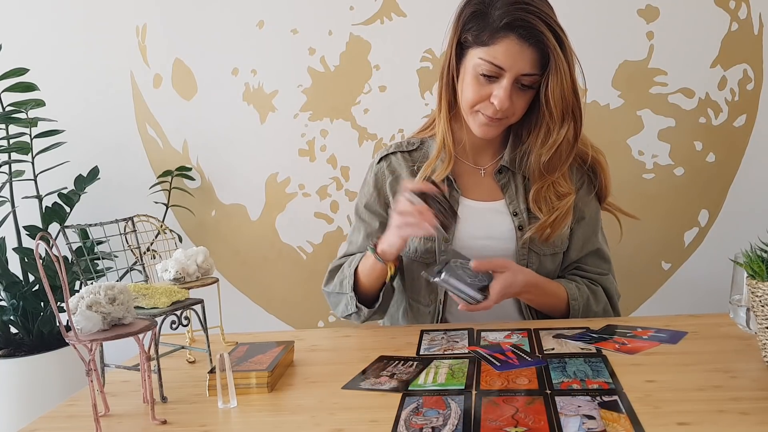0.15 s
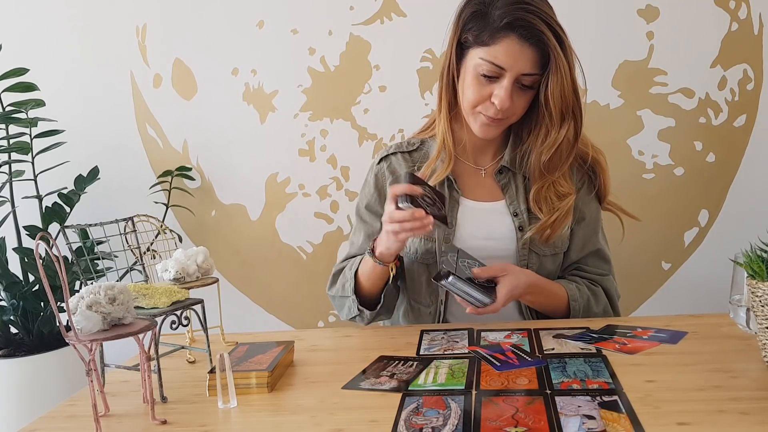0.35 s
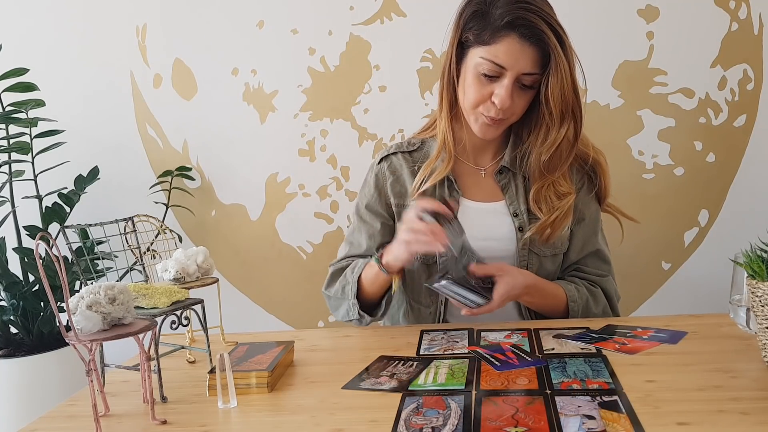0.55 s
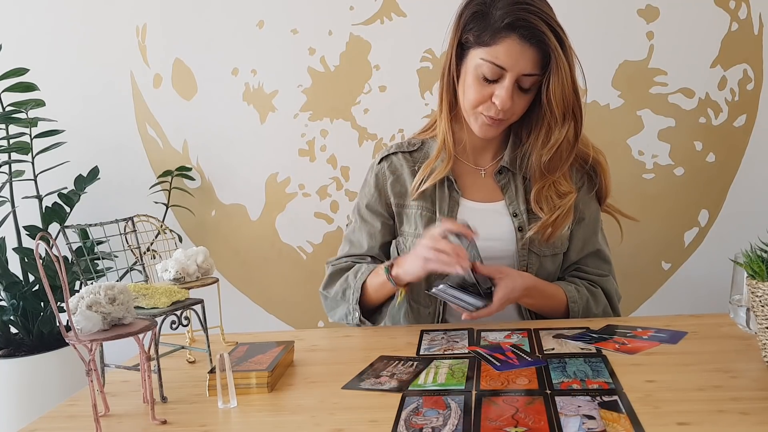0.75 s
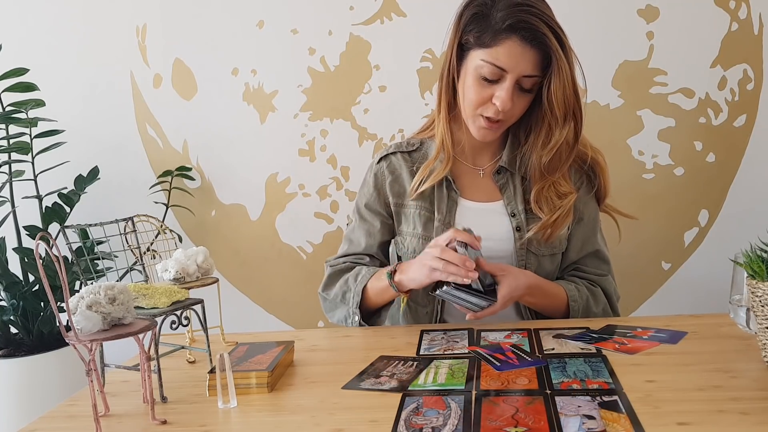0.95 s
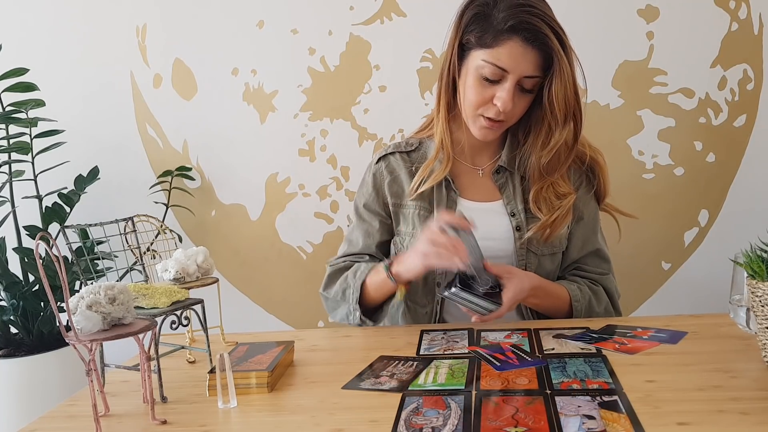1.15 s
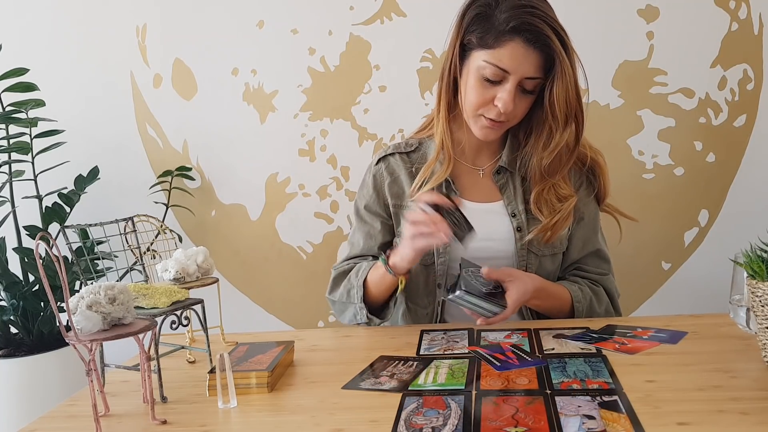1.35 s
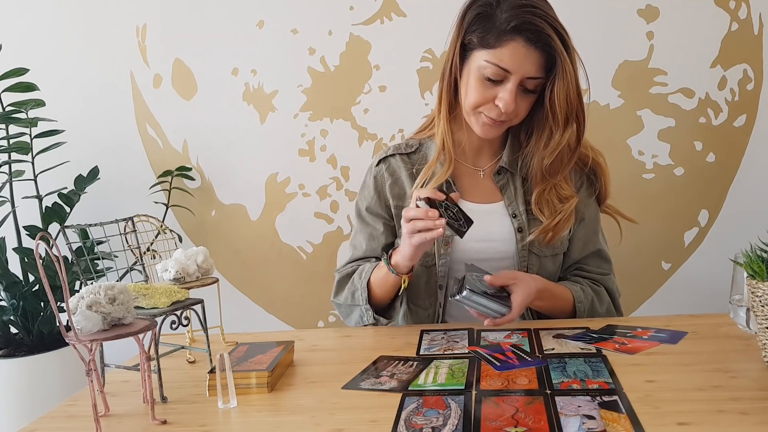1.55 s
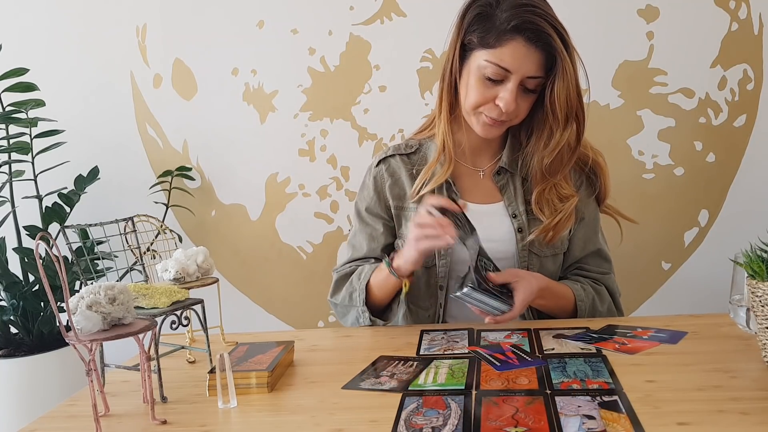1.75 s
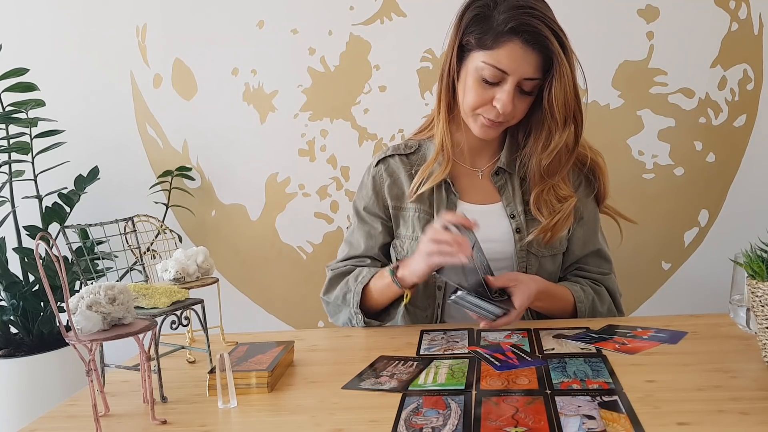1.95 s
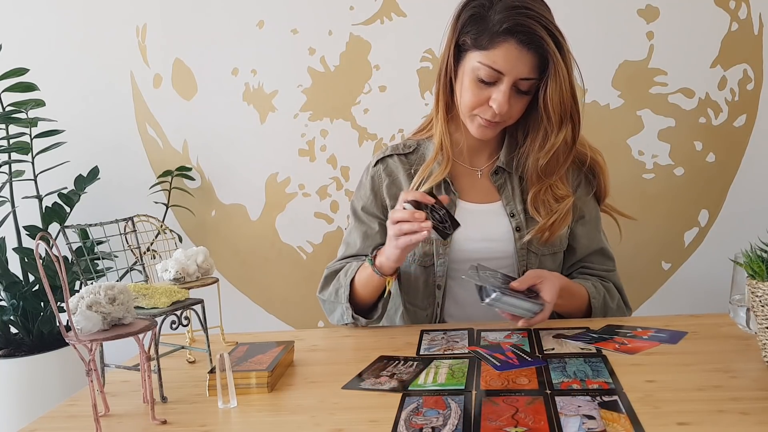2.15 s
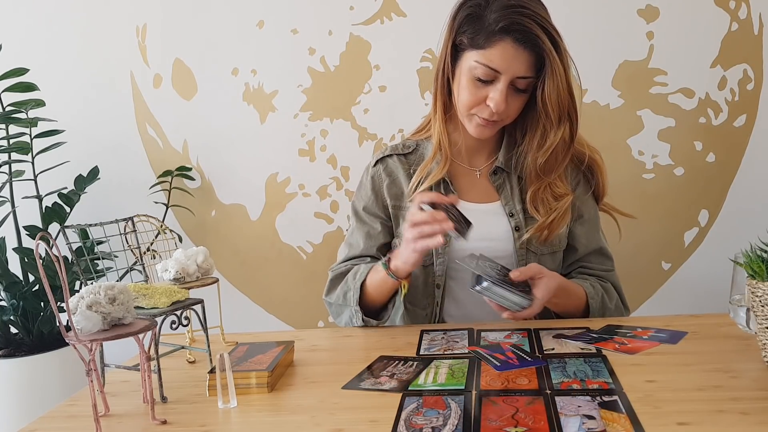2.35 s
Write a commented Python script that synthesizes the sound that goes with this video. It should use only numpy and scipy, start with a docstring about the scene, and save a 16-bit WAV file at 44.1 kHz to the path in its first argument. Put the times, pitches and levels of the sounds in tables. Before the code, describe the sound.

A deck of large cards shuffled overhand, snapping and sliding in quick clusters, in a lively room

```python
"""A deck of large cards is shuffled overhand at a table in a bare, lively room, over a low steady rumble.
At once a packet is sliding: stick-slip friction drives a resonant card stack, and the room answers with
echoes and a diffuse tail. Soft bumps of the deck in the palm join in, low tones with a puff of noise.
Then card edges snap and packets slap onto the deck, impulses followed by a scatter of smaller ones.
A stereo microphone a few steps away hears more of the room than of the hands."""
import sys
import numpy as np
from scipy import signal
from scipy.fft import rfft, irfft, next_fast_len
from scipy.io import wavfile
from scipy.ndimage import uniform_filter1d

SR = 44100
rng = np.random.default_rng(int(sys.argv[2]) if len(sys.argv) > 2 else 0)


def int16_out(signal):
    """Quantize to a 16-bit WAV file."""
    q = np.round(np.clip(np.atleast_2d(signal).T, -1, 1) * 32767)
    wavfile.write(sys.argv[1], SR, q.astype(np.int16))


N = 105840  # samples


def amp(db):
    """Level law: 20 dB is a factor of ten in amplitude."""
    return 10 ** (np.asarray(db) / 20)


def unit(x):
    """Normalization: scales to an energy of one."""
    return x / np.sqrt(np.sum(x ** 2) + 1e-20)


def sized(x, db):
    """Energy equivalence: gives a sound the energy of a hundredth of a second at that level."""
    return unit(x) * amp(db) * np.sqrt(SR / 100)


def read(points, hz):
    """Logarithmic frequency scale: interpolates a table along it."""
    f, value = np.transpose(points)
    return np.interp(np.log(hz + 1), np.log(f + 1), value)


def add(mix, s, sound):
    """Superposition: mixes a sound in at a time, cutting what falls outside."""
    at = round(s * SR)
    sound = sound[..., max(-at, 0):]
    part = mix[..., max(at, 0):][..., :sound.shape[-1]]
    part += sound[..., :part.shape[-1]]


def coherent_pair(a, b, same):
    """Partial coherence: the second channel shares the fraction `same` of the first."""
    return np.array([a, same * a + np.sqrt(1 - same ** 2) * b])


# spectrum of the room's background: (frequency [Hz], relative level [dB])
RUMBLE_SPECTRUM = [(25, -18), (44, 3.5), (62, -13), (84, 3), (110, -12.5), (220, -24.5), (600, -34),
                   (3000, -38)]
RUMBLE_DB, RUMBLE_COHERENCE = -64.5, .965  # RMS level over both channels; 1 is identical channels


def rumble():
    """Stationary random noise: the low steady background of the room, with faint hiss."""
    a, b = rng.standard_normal((2, N))
    spectrum = rfft(coherent_pair(a, b, RUMBLE_COHERENCE))
    x = irfft(spectrum * amp(read(RUMBLE_SPECTRUM, np.fft.rfftfreq(N, 1 / SR))), N)
    return amp(RUMBLE_DB) * x / x.std()


PATHS = 6  # separate ways through the room
SLIPS_PER_S, SLIP_SPREAD_DB = 6100, 3.5  # mean rate; scale of the exponential spread in level


def slips(count):
    """Stick-slip: random impulses of uneven size, each radiating into the room along one of several paths."""
    size_db = SLIP_SPREAD_DB * np.minimum(rng.exponential(1, count), 3)
    occurs = rng.random(count) < SLIPS_PER_S / SR
    train = rng.choice([-1., 1.], count) * amp(size_db) * occurs
    return train * (rng.integers(0, PATHS, count) == np.arange(PATHS)[:, None])


def hump(hz, centre_hz, q):
    """Resonance: amplitude gain of one damped oscillator, one at its centre."""
    return 1 / np.sqrt(1 + (q * (hz / centre_hz - centre_hz / hz)) ** 2)


# colour of card stock: (frequency [Hz], gain [dB])
CARD_COLOUR = [(30, -22), (70, -19.5), (130, -11), (210, -12), (300, -8.5), (600, -2.5), (1000, -4),
               (1300, -3), (2000, -4), (2700, -0.5), (4400, -3), (6000, -8), (8000, -12.5), (11000, -13),
               (15500, -20.5)]
BASS_HZ, TREBLE_HZ = 770, 6300  # corners of the low and high shelves


def packet(q, pitch_hz, ring_db, bass_db, treble_db, size=2048):
    """Minimum-phase response: card colour and one damped bending resonance of a gripped packet."""
    hz = abs(np.fft.fftfreq(size, 1 / SR)) + 1
    bass = bass_db / (1 + (hz / BASS_HZ) ** 4)
    treble = treble_db / (1 + (TREBLE_HZ / hz) ** 4)
    db = read(CARD_COLOUR, hz) + bass + treble + ring_db * hump(hz, pitch_hz, q)
    # the Hilbert transform of the log gain supplies the phase of a causal response
    log_response = np.conj(signal.hilbert(np.log(amp(db))))
    return np.fft.ifft(np.exp(log_response)).real[:size // 2]


# cards rubbing over each other: (time [s], swell [s], fade [s], relative level [dB],
# packet pitch [Hz], packet ring [dB], bass [dB], treble [dB])
SLIDE_EVENTS = [ (-.06, .07, .035, -51, 1250, 3, 8, -3), (.068, .015, .011, -41, 2900, 1, 5, 4),
                (.340, 0.0071, 0.024, -41, 1390, 6.5, 4.5, -0.5),
                (0.585, 0.0059, 0.0088, -37, 1650, 6.5, 7, 2),
                (.748, 0.0029, 0.0095, -42, 2600, 25, -9, 20),
                (.820, 0.0016, 0.0036, -31, 994, 22.5, 16, 15),
                (.990, 0.0052, 0.036, -53.5, 1000, 7, 3.5, 8.5),
                (1.066, 0.011, 0.0051, -35, 1680, 12, 2, 10.5),
                (1.214, 0.008, 0.067, -55.5, 1600, 8, -2, 6.5),
                (1.303, 0.0055, 0.008, -38, 4050, 6.5, 4, 7.5),
                (1.462, 0.015, 0.0059, -38, 3700, -2.5, -26.5, -4),
                (1.533, 0.0058, 0.0071, -33, 1340, 12, 5.5, 5),
                (1.678, 0.0032, 0.024, -43, 1540, 8, 3.5, 5), (1.840, 0.028, 0.079, -44.5, 1630, 3, 5, 2.5),
                (1.915, 0.019, 0.0064, -47, 332, 16, 20, -6),
                (1.995, 0.027, 0.0054, -42, 1810, 6.5, 1.5, 6)]
SLIDE_DIRECT_DB, SLIDE_Q = 0.5, 5.3  # gain of the direct sound; sharpness of the packet resonance
JUDDER_DB, JUDDER_PER_S = 2.5, 126.6  # standard deviation and rate of the random levels


def slide(swell_s, fade_s, db, *colour):
    """Friction: noise swells as a packet gathers speed, judders, and fades as it comes free."""
    t = np.arange(SR // 3) / SR
    fade = np.exp(-(np.maximum(t - swell_s, 0) / fade_s) ** 2 / 2)
    speed = np.minimum(t / swell_s, 1) * fade
    # the packet catches and lets go
    catches = np.interp(t * JUDDER_PER_S, np.arange(64), rng.standard_normal(64))
    drive = unit(slips(len(t)) * speed * amp(JUDDER_DB * catches)) * np.linalg.norm(speed)
    return amp(db) * signal.fftconvolve(drive, unit(packet(SLIDE_Q, *colour))[None], axes=1)


def evened(x, envelope, count=4):
    """Spectral whitening: lays an envelope on a random burst and smooths chance peaks out of its spectrum."""
    x = x * envelope
    for _ in range(count):
        z = rfft(x)
        x = irfft(z / (abs(z) + 1e-12), len(x))
        local_level = np.sqrt(abs(uniform_filter1d(x ** 2, size=128)) + 1e-14)
        x = x * envelope / local_level
    return unit(x)


# clusters of early echoes from the table and the walls: (delay [s], spread [s], level [dB])
EARLY_ECHOES = [(.0018, 0.00044, -1), (.0085, 0.0011, 1.5)]
# time for the reverberation to fall by 60 dB: (frequency [Hz], time [s])
REVERBERATION = [(100, 0.62), (400, 0.41), (1200, 0.39), (3000, 0.36), (7000, 0.33), (15000, 0.25)]
# resonances that stand out of the room's tail: (frequency [Hz], level against the diffuse tail [dB])
STANDING_MODES = [(129, -27.5), (846, -33.5), (1306, -34), (1448, -27.5)]
# likeness of the room sound at the two microphones: (frequency [Hz], coherence [0 to 1])
ROOM_COHERENCE = [(60, .96), (130, .93), (290, .55), (640, .15), (1400, 0)]
ROOM_DB, ROOM_BUILD_S = 8, 0.0031  # gain of the tail; time constant of its onset


def room(size=24576):
    """Reverberation: one path to both microphones, of early echoes, a diffuse tail and ringing modes."""
    t, hz = np.arange(size) / SR, np.fft.rfftfreq(size, 1 / SR)
    bands, frames, z = signal.stft(rng.standard_normal((2, size)), SR, nperseg=512)
    z = z * np.exp(-np.log(1000) * frames / read(REVERBERATION, bands)[:, None])
    tail = signal.istft(z, SR, nperseg=512)[1][:, :size] * (1 - np.exp(-t / ROOM_BUILD_S))
    tail = tail / np.linalg.norm(tail[0])
    for mode_hz, db in STANDING_MODES:
        decay = np.exp(-np.log(1000) * t / read(REVERBERATION, mode_hz))
        phases = rng.random(2)[:, None]  # in turns, one for each microphone
        for channel, ring in zip(tail, decay * np.sin(2 * np.pi * (mode_hz * t + phases))):
            channel += amp(db) * unit(ring)
    early = np.zeros(1024)
    for delay_s, spread_s, db in EARLY_ECHOES:
        early += amp(db) * unit(np.exp(-((t[:1024] - delay_s) / spread_s) ** 2 / 2))
    bursts = rng.standard_normal((2, len(early)))
    echoes = np.array([evened(x, early) for x in bursts]) * np.linalg.norm(early)
    a, b = rfft(tail) * amp(ROOM_DB) + rfft(echoes, size)
    pair = coherent_pair(a, b, read(ROOM_COHERENCE, hz))
    return irfft(pair, size)[:, :-size // 8]


def one_path():
    """Point source: picks the path for a single impact."""
    return np.eye(PATHS)[rng.integers(PATHS)]


# the deck bumping in the palm: (time [s], relative level [dB], settled pitch [Hz])
BUMP_EVENTS = [(0.089, -55.5, 132), (0.351, -57.5, 132), (.372, -55.5, 340), (0.826, -52.5, 129),
               (1.093, -49, 123), (1.122, -48, 256), (1.213, -55, 139.5), (1.784, -51, 127),
               (1.903, -54, 428)]
BUMP_DIRECT_DB, BUMP_RISE_S = 5, 0.007  # gain of the direct sound; time to the peak of the push
BUMP_SWISH_DB, BUMP_Q = -3, 1.8  # puff against tone; sharpness of the puff's band
BUMP_SAG = 0.18  # the pitch starts this fraction higher and sinks as the palm gives way


def bump(db, pitch_hz):
    """Damped oscillation: a dull push of the deck on the palm, with a puff of squeezed air."""
    t = np.arange(SR // 10) / SR
    push = t * np.exp(-t / BUMP_RISE_S)
    edges_hz = pitch_hz * np.exp(np.array([-.5, .5]) / BUMP_Q)
    band = signal.butter(2, edges_hz, "bandpass", fs=SR)
    puff = signal.lfilter(*band, push * rng.standard_normal(len(t)))
    sinking_hz = pitch_hz * (1 + BUMP_SAG * np.exp(-t / (2 * BUMP_RISE_S)))
    tone = push * np.sin(2 * np.pi * np.cumsum(sinking_hz) / SR)
    return sized(unit(tone) + amp(BUMP_SWISH_DB) * unit(puff), db)


# card edges and packets striking the deck: (time [s], direct sound gain [dB], relative level [dB],
# scatter [s], packet pitch [Hz], packet ring [dB], bass [dB], treble [dB])
SNAP_EVENTS = [ (0.2536, -1.5, -30.5, 0.0023, 1340, 11.5, -16, 0.5),
               (.2690, -2.5, -33.5, 0.0013, 4300, 8.5, -11, -9.5),
               (0.3535, -1.5, -36, 0.0025, 2700, 10.5, -5, -2.5),
               (0.5129, 4.5, -40, 0.00076, 650, 11, -6, -5.5),
               (0.7398, -4, -36.5, 0.0013, 1305, 11.5, 7.5, 4.5),
               (.8255, 2.5, -32.5, 0.0042, 1320, 21.5, 0.5, 10.5),
               (.8330, 0.5, -32.5, 0.0033, 800, 13, 4.5, 6.5),
               (0.9812, 0.5, -45.5, 0.00012, 900, 8.5, -1, 9), (1.116, 7.5, -44, 0.0019, 850, 8.5, 7, -15),
               (1.207, -2, -42.5, 0.011, 1620, 16, 3, -5), (1.303, 8.5, -44, 0.0018, 1546, 26, 0, 9.5),
               (1.4515, -5, -31, 0.00089, 1510, 16.5, -9.5, -2),
               (1.491, 5.5, -32.5, 0.0089, 1560, 10, -2.5, -0.5),
               (1.499, -1, -38, 0.002, 2600, 12, 2.5, -12), (1.710, -1, -37.5, 0.0032, 1520, 15.5, -5, -21),
               (1.782, 0, -26.5, .0065, 1294, 10.5, -0.5, -1),
               (1.802, 5, -32.5, 0.0025, 2000, 18.5, -17, -20.5),
               (1.863, 1.5, -38.5, 0.0011, 2900, 5.5, 8.5, -13), (1.91, 8.5, -42.5, 0.005, 1500, 27, 6, -8)]
SNAP_Q = 4.8  # sharpness of the packet resonance
LOOSE_S = 0.009  # in a packet that scatters longer than this, the first edge hardly stands out


def snap(db, scatter_s, *colour):
    """Impulse excitation: one edge lands, and the cards behind it follow within milliseconds."""
    t = np.arange(SR // 20) / SR
    drive = unit(slips(len(t)) * np.exp(-t / scatter_s))
    drive[:, 0] = one_path() / np.sqrt(1 + scatter_s / LOOSE_S)
    return sized(signal.fftconvolve(drive, packet(SNAP_Q, *colour)[None], axes=1), db)


# balance between the channels: (frequency [Hz], left minus right [dB])
CHANNEL_LEAN = [(100, 1), (350, 0.5), (700, 1.5), (4400, 0.9), (8000, 1), (15000, -3.5)]
LEFT_LAG_S = .000035  # the direct sound reaches the left this much later


def scene():
    """Linear superposition: the hands heard directly and by way of the room, over the rumble."""
    direct, paths = np.zeros(N), np.zeros((PATHS, N))
    sounds = [(s, SLIDE_DIRECT_DB, slide(*row)) for s, *row in SLIDE_EVENTS]
    sounds += [(s, BUMP_DIRECT_DB, np.outer(one_path(), bump(*row))) for s, *row in BUMP_EVENTS]
    sounds += [(s, direct_db, snap(*row)) for s, direct_db, *row in SNAP_EVENTS]
    for s, direct_db, sound in sounds:
        add(paths, s, sound)
        add(direct, s, amp(direct_db) * sound.sum(0))
    size = next_fast_len(N + SR)
    hz = np.fft.rfftfreq(size, 1 / SR)
    lag_s = LEFT_LAG_S * np.array([[1], [0]])
    heard = rfft(direct, size) * np.exp(-2j * np.pi * hz * lag_s)
    heard += sum(rfft(x, size) * rfft(room(), size) for x in paths)
    lean_db = read(CHANNEL_LEAN, hz) * np.array([[.5], [-.5]])
    hands = irfft(heard * amp(lean_db), size)[:, :N] / 2
    return hands + rumble()


def record(dry):
    """Band limitation: the recorder passes only what lies below 16.1 kHz."""
    low_pass = signal.firwin(511, 16100, window=("kaiser", 9), fs=SR)
    return signal.oaconvolve(dry, low_pass[None], "same")


dry = scene()
out = record(dry)
int16_out(out)
```